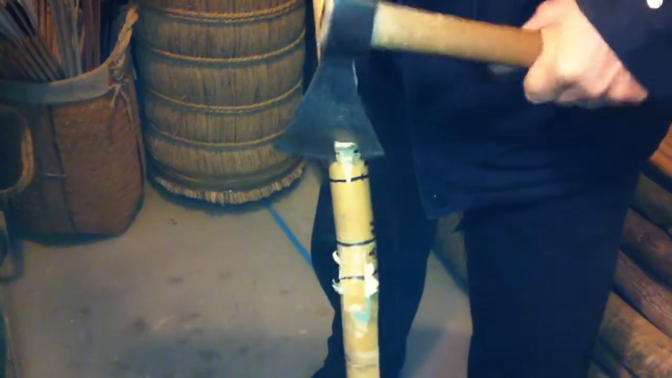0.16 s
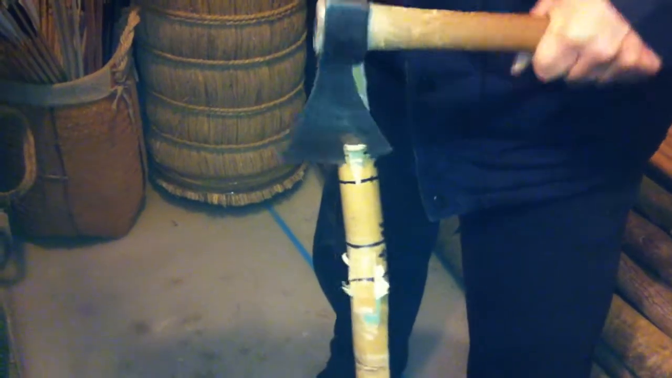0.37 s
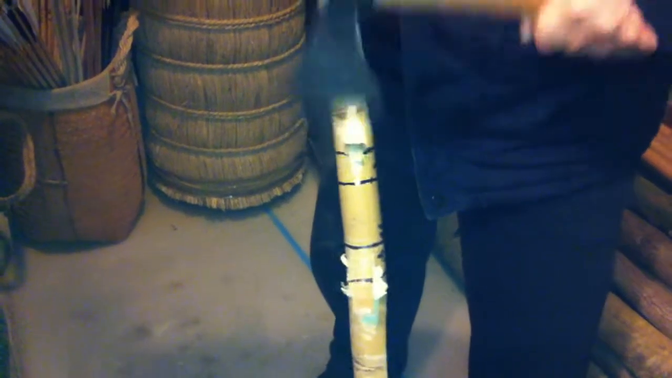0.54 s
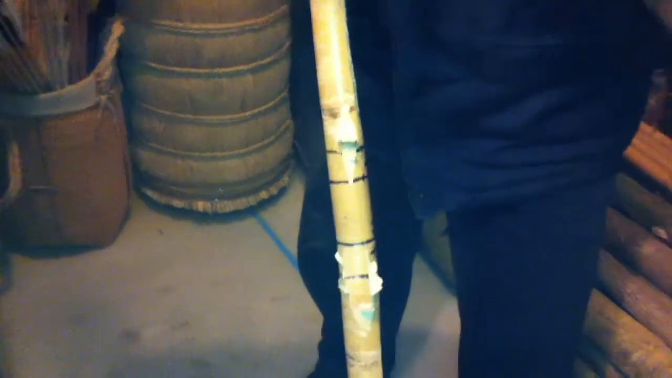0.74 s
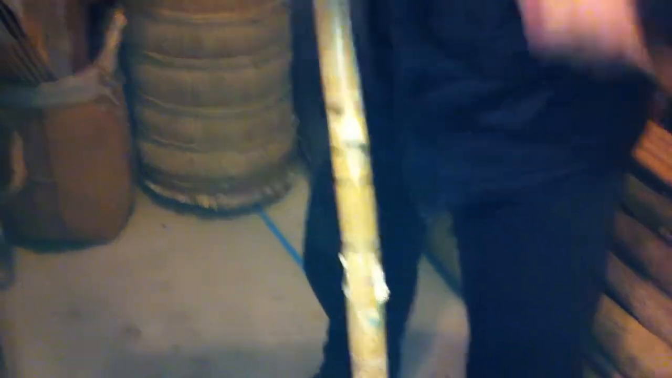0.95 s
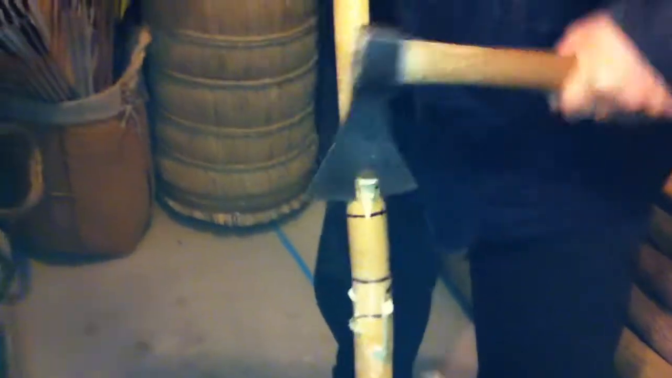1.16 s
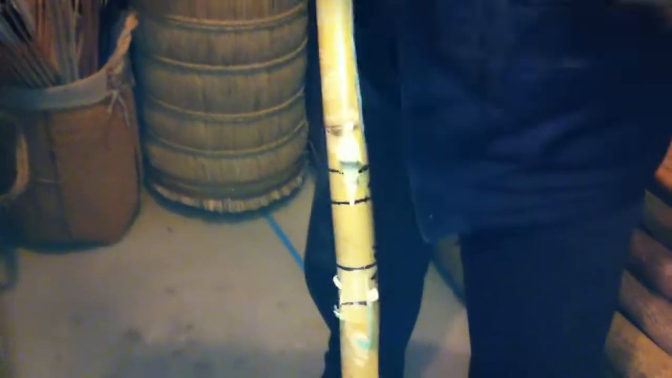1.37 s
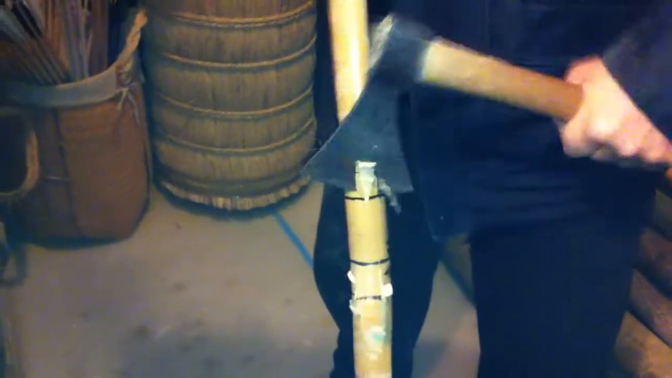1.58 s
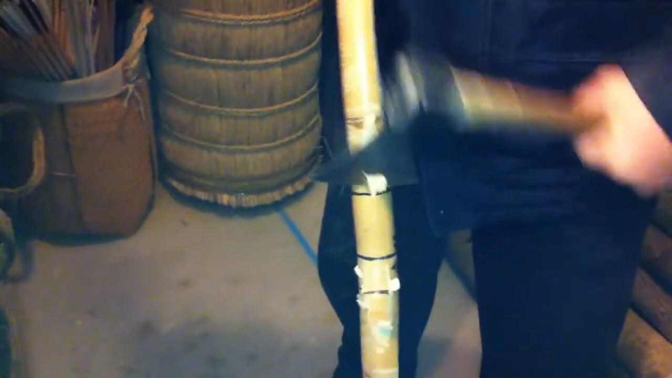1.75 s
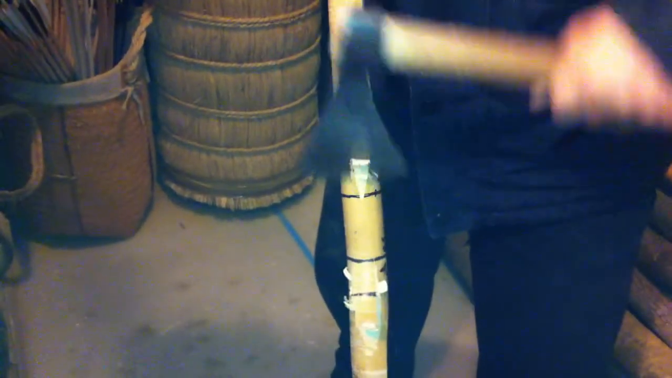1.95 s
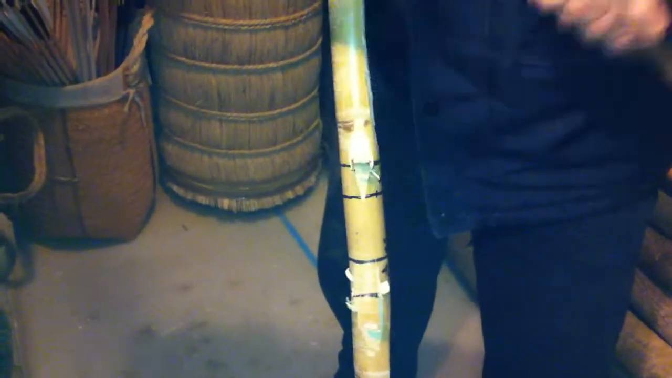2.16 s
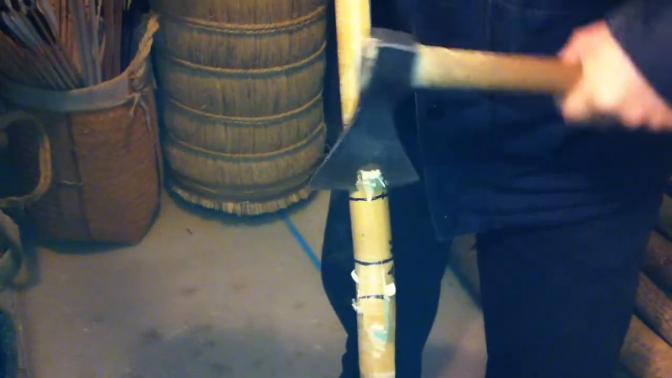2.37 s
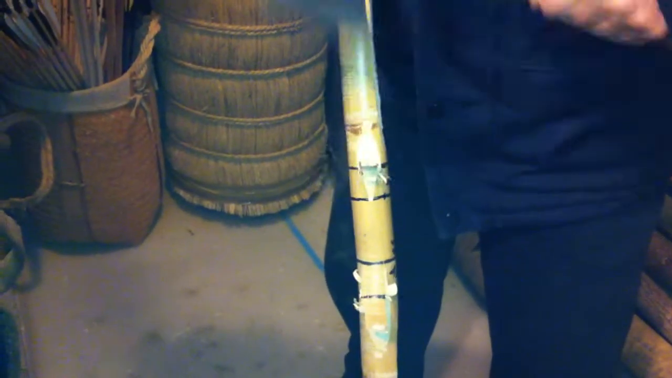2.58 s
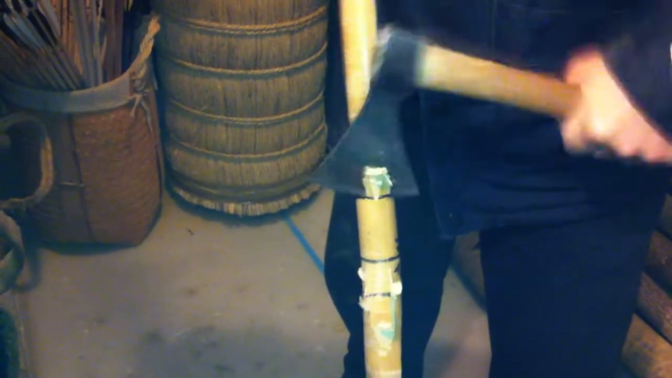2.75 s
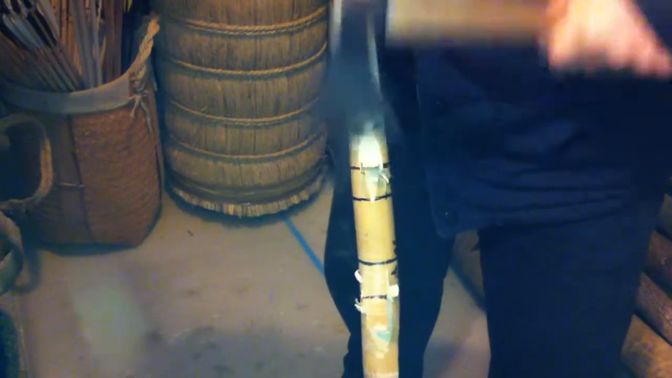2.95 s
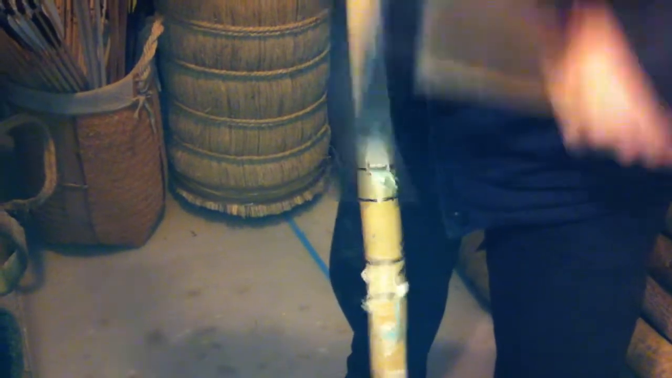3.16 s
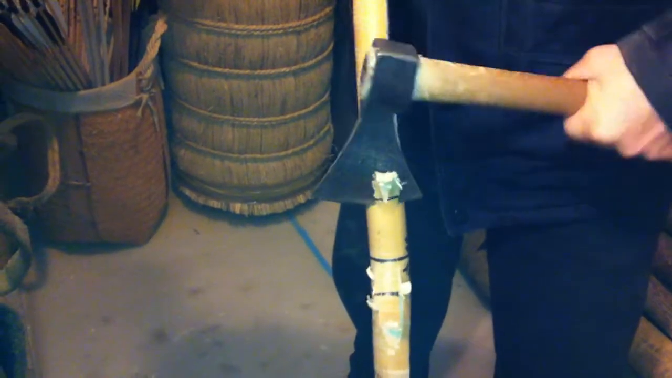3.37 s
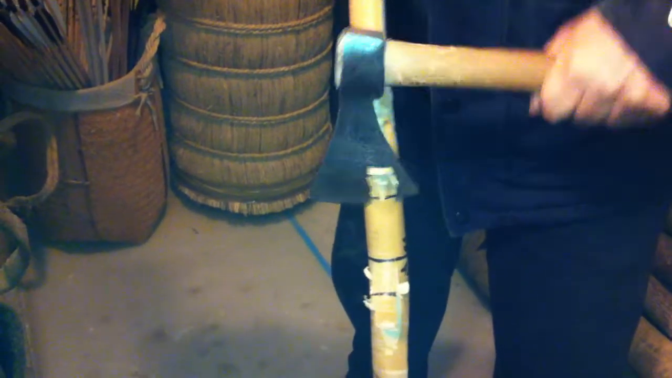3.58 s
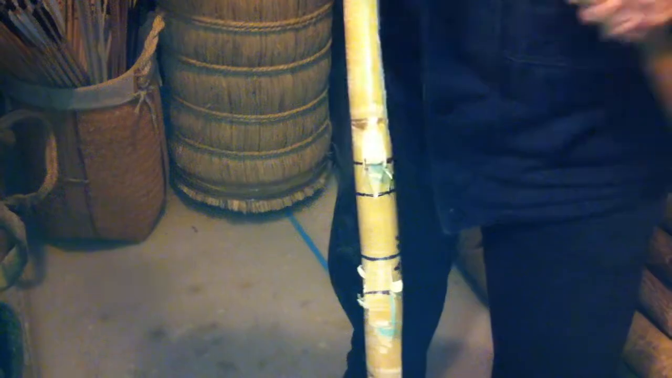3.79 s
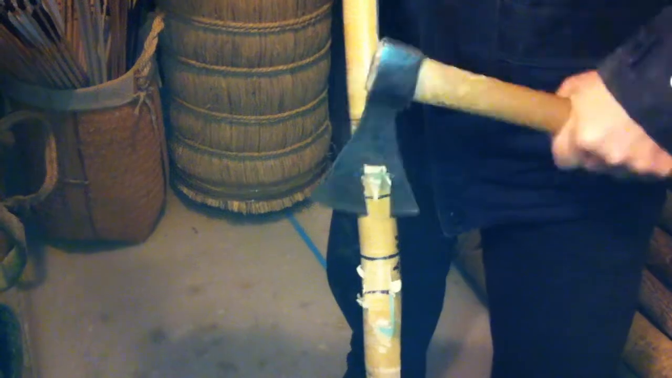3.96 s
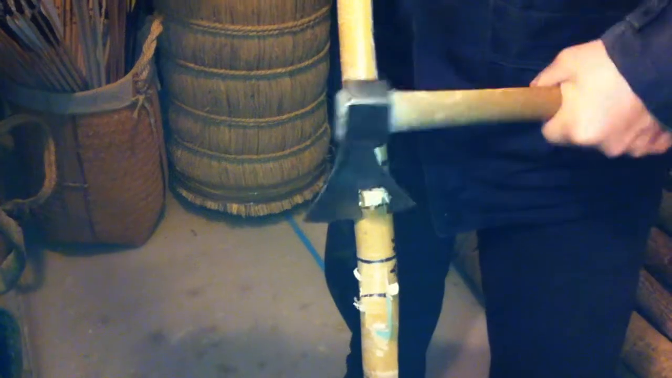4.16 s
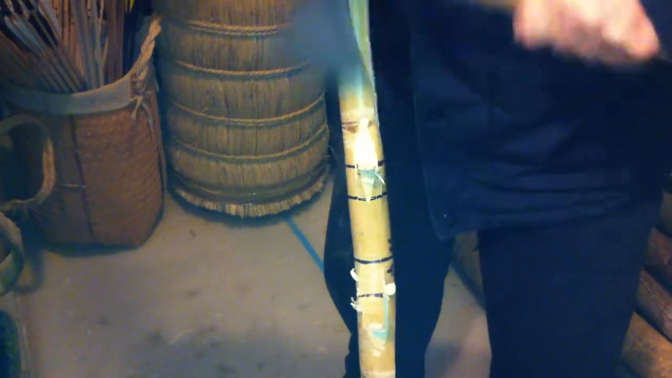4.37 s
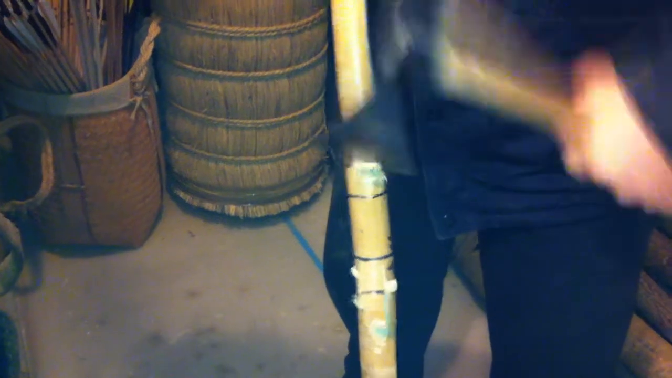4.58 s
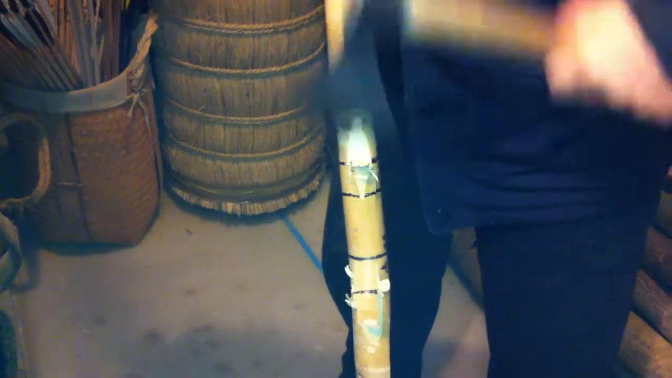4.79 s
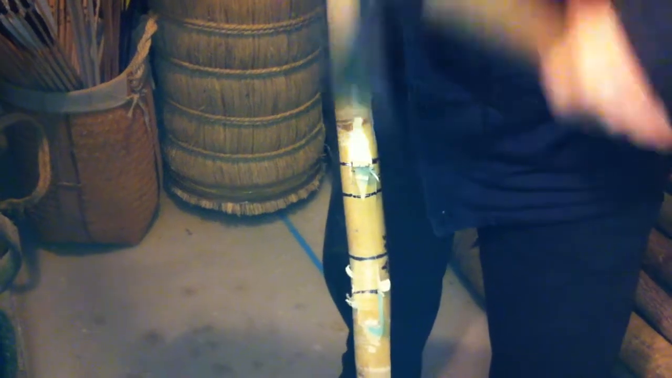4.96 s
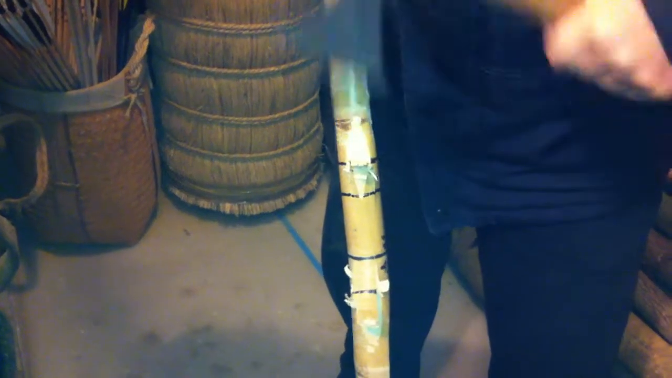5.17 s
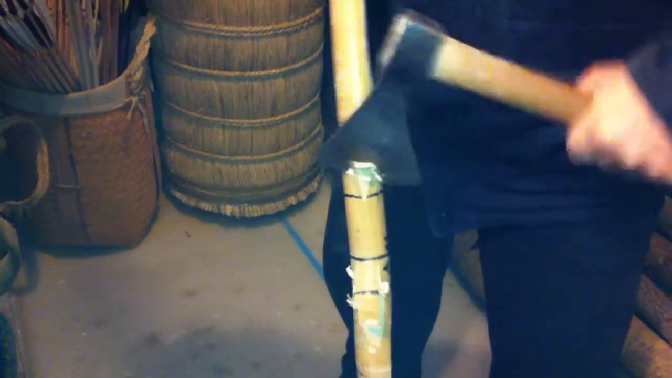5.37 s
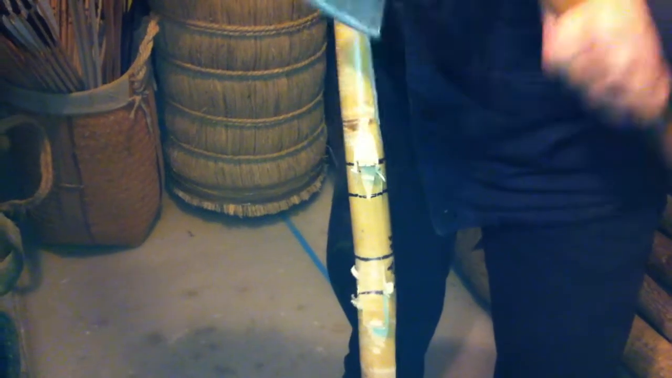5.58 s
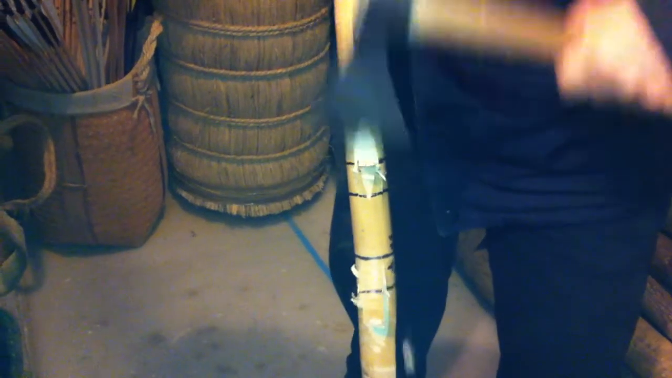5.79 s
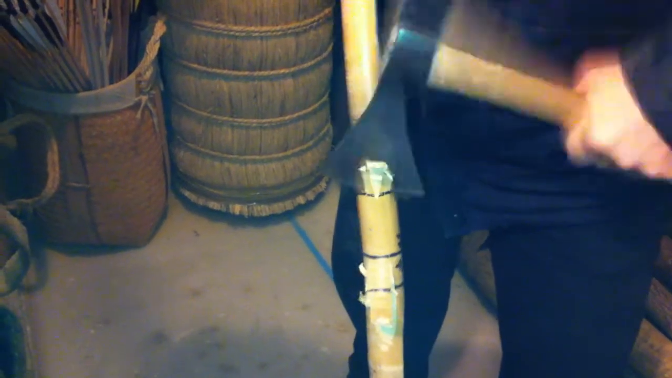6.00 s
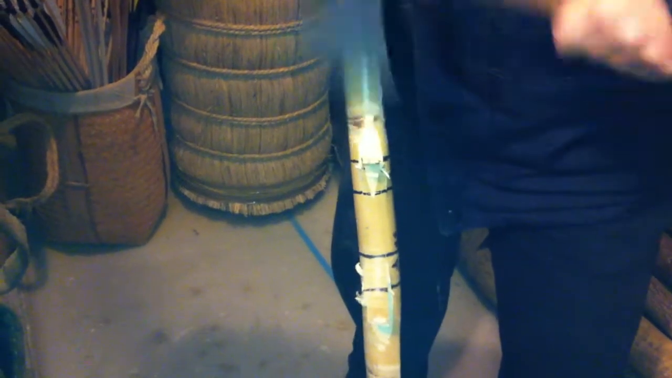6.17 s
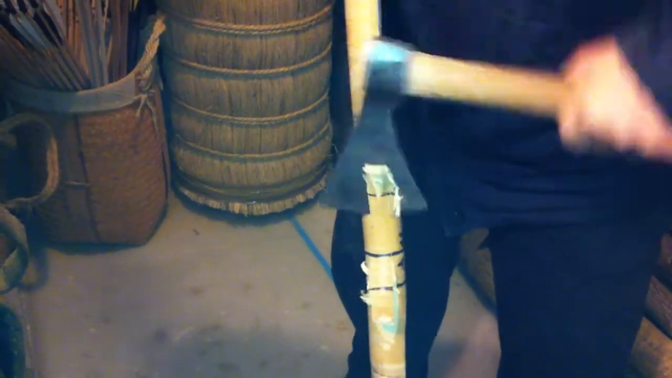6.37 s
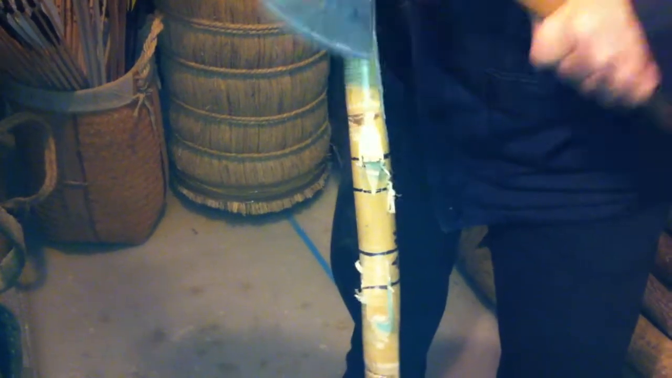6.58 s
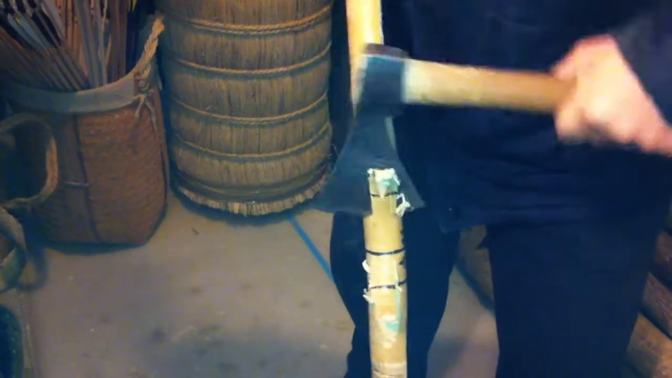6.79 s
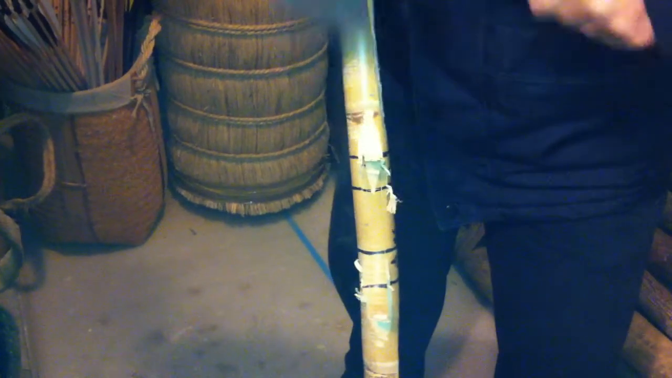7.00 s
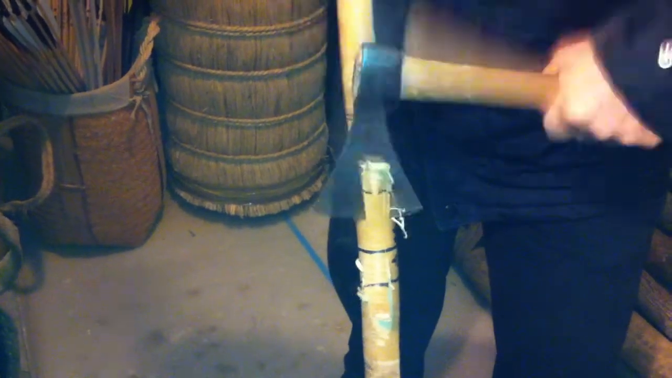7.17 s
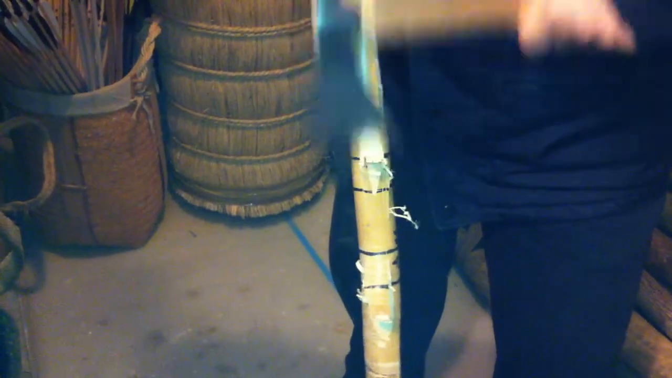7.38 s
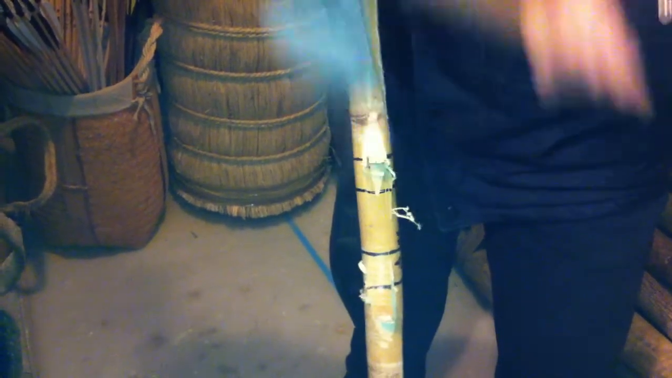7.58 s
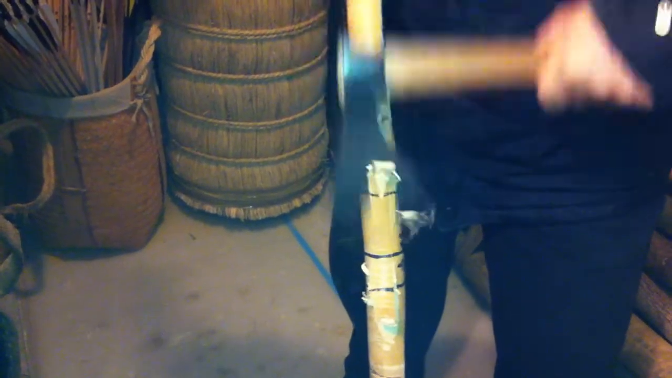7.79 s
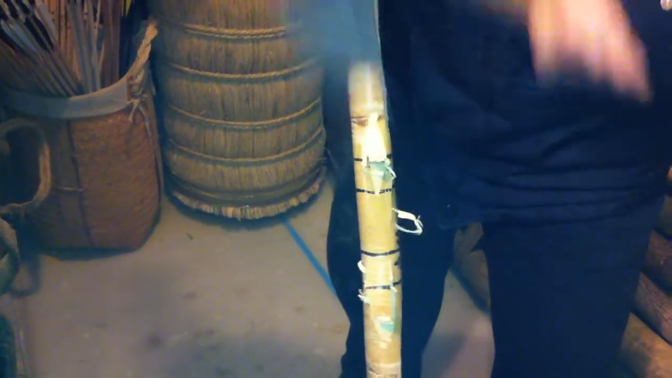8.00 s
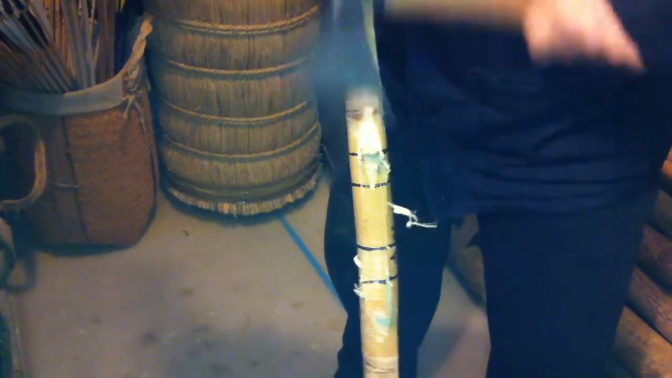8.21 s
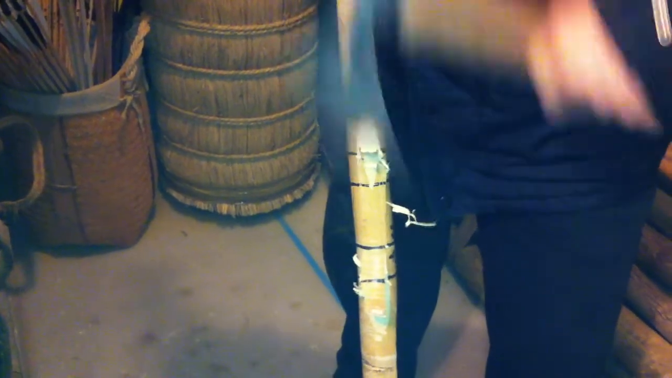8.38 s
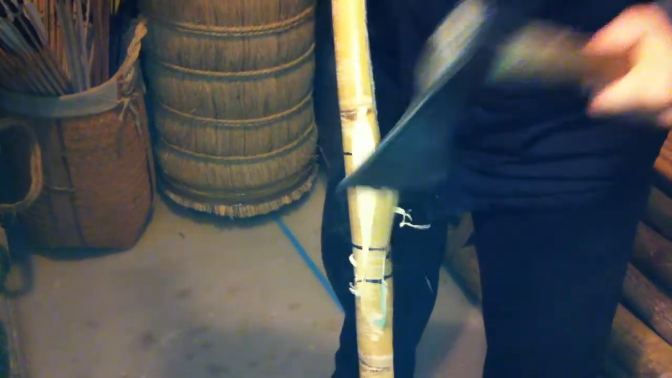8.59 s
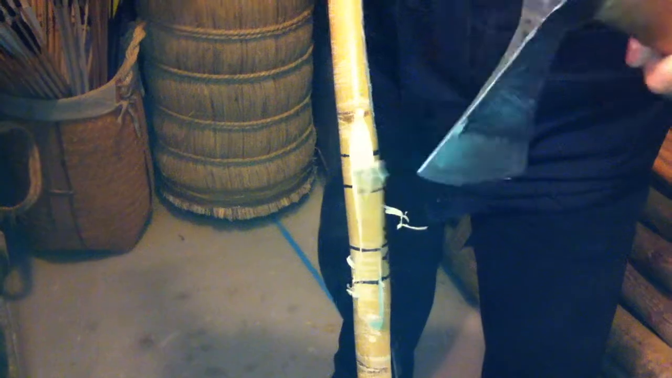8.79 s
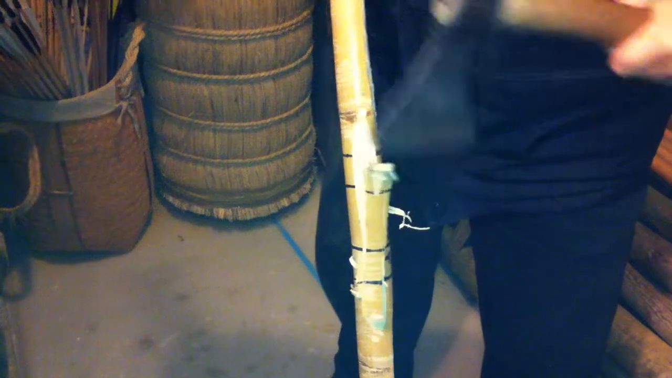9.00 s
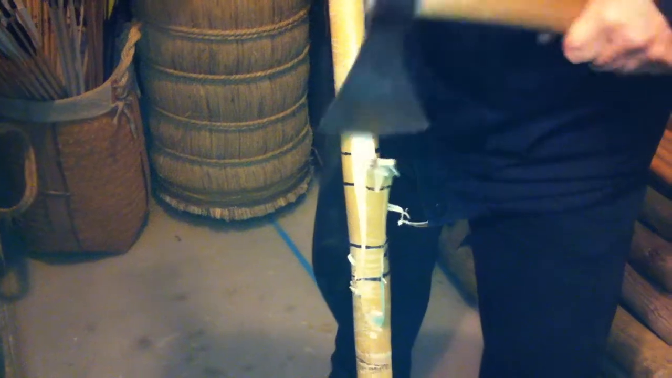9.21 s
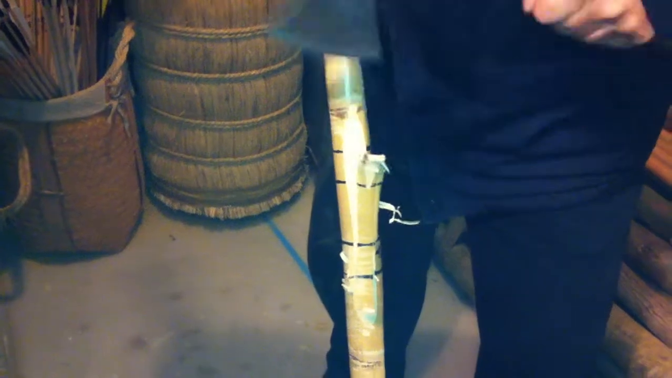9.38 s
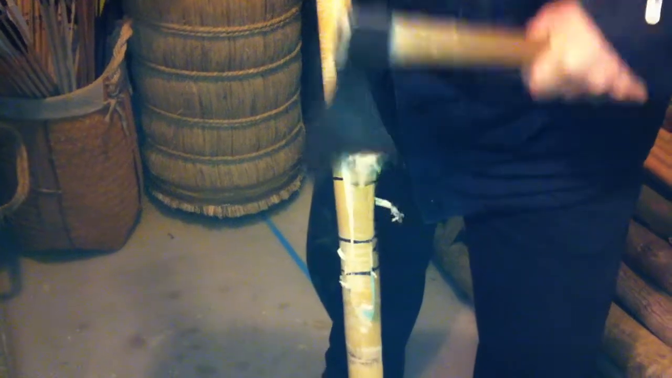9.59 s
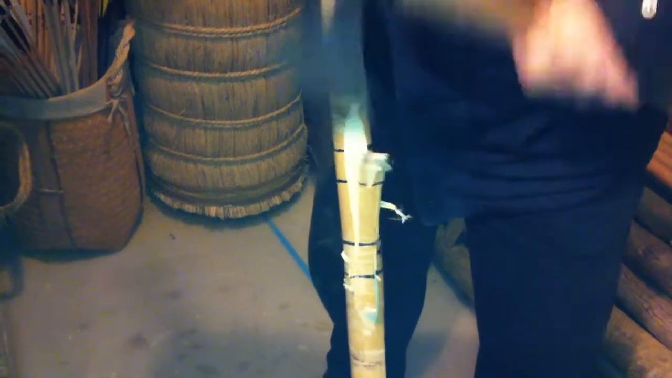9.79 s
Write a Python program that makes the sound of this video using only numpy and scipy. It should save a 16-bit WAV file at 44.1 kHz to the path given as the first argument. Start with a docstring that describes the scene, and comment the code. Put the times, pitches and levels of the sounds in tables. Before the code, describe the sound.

A hatchet chops a wooden stave, close to the microphone. Each blow is a hard, dry knock with crunching fibres, a clipped metallic clank and a light floor thud. Spaced out at first, the blows become brisker, then give way to scraping, splitting and a bright blade ring before one last chop. A small workshop answers immediately, with a fainter larger space behind and soft hiss.

```python
"""Sharp wooden chops are heard first: a steel hatchet hews a stave standing on a workshop floor, close by.
Each chop excites floor and stave modes, cracks fibres as filtered noise and rings the blade, which the cut damps.
Between chops the edge slides and brushes, single fibres snap, and the blade, lifted out, sings freely.
The shop answers at once, a larger space behind it a tenth of a second later, over a quiet hiss."""
import sys
import numpy as np
from scipy import signal
from scipy.fft import rfft, irfft, next_fast_len
from scipy.io import wavfile
from scipy.ndimage import uniform_filter1d

SR = 44100
rng = np.random.default_rng(int(sys.argv[2]) if len(sys.argv) > 2 else 0)


def put_to_file(sound):
    """Save the sound as 16-bit audio at rate SR, in the file named by the first command-line argument."""
    columns = np.atleast_2d(sound).T  # one column per channel
    safe = np.clip(columns, -1, 1)
    whole_steps = np.round(safe * 32767)
    wavfile.write(sys.argv[1], SR, whole_steps.astype(np.int16))


N = 434385  # length in samples


# Bending modes of the steel blade: pitch_hz
BLADE_HZ = [3005, 3965, 4750, 5010, 5660, 5905, 7295, 8800, 9490, 9745, 10925, 11700, 12950, 14290, 14760,
            15230]
# The same modes with the blade hanging free: level_db (relative), t60_s
BLADE_FREE = [(-1, 1.4), (2, .15), (0, .28), (-4, .12), (-10, .12), (-1, .6), (-1, .11), (1, .17),
              (-5, .18), (2, .18), (-4, .12), (-13, .12), (-17, .05), (-6, .15), (-3, .09), (-11, .12)]
BLADE = np.column_stack([BLADE_HZ, BLADE_FREE])
# Full blows of the hatchet: start_s, knock_db, low_knock_db, fibre_crack_db, steel_db
CHOPS = [(0.1096, -10.5, -15.5, -15, -20.5), (1.1166, -11, -17, -14.5, -19),
         (1.715, -32.5, -19.5, -26.5, -33), (1.7185, -24, -20, -20, -28),
         (2.4287, -12, -16.5, -14.5, -27.5), (2.8881, -16, -21.5, -13, -24.5),
         (3.3411, -11, -20.5, -12, -20), (4.0856, -12, -20.5, -14, -17.5), (4.7428, -15.5, -17.5, -19, -29),
         (5.1434, -15, -19, -13, -18), (5.4849, -13, -18, -14.5, -21), (5.8356, -11, -17.5, -16.5, -21.5),
         (6.1537, -10.5, -15.5, -11, -27.5), (6.4991, -12.5, -19.5, -11, -14),
         (6.5379, -28, -29.5, -33.5, -44), (6.8275, -15, -21, -19.5, -18.5),
         (7.3003, -13, -34, -16.5, -20.5), (7.3195, -11.5, -36, -26.5, -30),
         (7.7685, -9.5, -21.5, -18, -29), (8.168, -26.5, -31, -29, -27), (8.2007, -15.5, -23.5, -53, -32),
         (9.6775, -16.5, -17.5, -19, -42)]


def chop(start_s, knock_db, low_db, crack_db, steel_db):
    """Damped modal excitation: the blade judders into the cut and stays there, so all its modes die fast."""
    crunch_t60_s, thud_re_low_db = 0.027, -19
    judder_t60_s, cut_damping_per_s = 0.057, 26
    begin_s, out = knock(start_s, knock_db, low_db + thud_re_low_db, low_db, crack_db, crunch_t60_s)
    t = np.arange(2048) / SR
    judder = grit(len(t), 2.4) * gain_of(-60 * t / judder_t60_s)
    judder[0] += 10.5  # the landing
    steel = signal.fftconvolve(judder, ring(BLADE, 0.3, cut_damping_per_s, spread_db=2.3))
    add(out, start_s - begin_s, peaked(steel, steel_db))
    return begin_s, out


# The hatchet brushes the stave or leaves the cut: start_s, knock_db, low_knock_db, fibre_crack_db
TOUCHES = [(0.6137, -44, -52, -54), (0.8704, -59.5, -60, -60.5), (1.0328, -60, -50, -57),
           (1.3793, -47.5, -52, -50.5), (2.6131, -47.5, -53, -51.5), (3.7798, -55, -67, -52.5),
           (4.42, -57.5, -61.5, -54.5), (5.5996, -51.5, -56, -53), (7.436, -40, -40, -44),
           (7.9484, -67.5, -60, -58), (8.4317, -41, -47, -40.5), (8.5185, -35.5, -35.5, -38),
           (8.55, -33, -52, -32), (9.3057, -24, -25, -31)]


def touch(start_s, knock_db, low_db, crack_db):
    """Weak impact: a glancing contact gives a longer crunch and little force."""
    crunch_t60_s, thud_re_low_db = 0.06, -14
    return knock(start_s, knock_db, low_db + thud_re_low_db, low_db, crack_db, crunch_t60_s)


# Lower modes of the stave, before random spread: pitch_hz, level_db (relative), t60_s
STAVE_LOW = [(350, -17, 0.037), (470, -24, 0.0067), (554, -20.5, 0.0086), (700, -12, 0.012),
             (830, 3.5, 0.02), (907.5, 7.5, 0.012), (1044.5, 5.5, 0.015), (1200, 4.5, 0.014),
             (1327, 3.5, 0.0074)]
# Upper modes of the stave, before random spread: pitch_hz, level_db (relative), t60_s
STAVE_HIGH = [(1553, -9.5, 0.022), (1705, -5.5, 0.029), (1729, -2, 0.019), (1944, -0.5, 0.01),
              (2174, -2, 0.024), (2144, -12.5, 0.033), (2406, 4.5, 0.012), (2515, 5.5, 0.0083),
              (2840, 2, 0.003)]
# Spectrum of parting fibres: pitch_hz, level_db (relative)
CRACK = [(150, -25.5), (500, -8), (1500, -7), (3300, 2.5), (5000, 1.2), (7500, -4), (8200, -13.5),
         (10000, -10), (13000, -20.5), (15500, -13.5)]


def knock(start_s, knock_db, thud_db, low_db, crack_db, crunch_t60_s):
    """Source-filter impact: steel lands on wood, then crushes fibres; this force drives the stave's modes."""
    lead = 64  # samples before the landing
    t = np.arange(-lead, 6000) / SR
    landing = t == 0
    crush = grit(len(t), 4.4) * gain_of(-60 * t / crunch_t60_s) * (t > 0)
    force = crush + 16 * landing  # the landing outweighs the crunch
    low = signal.fftconvolve(force, ring(STAVE_LOW, 0.1, spread_db=2, detune=0.03))
    high = signal.fftconvolve(force, ring(STAVE_HIGH, 0.1, spread_db=2, detune=0.015))
    split = crush + 5 * landing  # the first fibres part all at once
    crack = coloured(split, CRACK) * signal.windows.tukey(len(t), 0.02)
    out = np.zeros(SR)
    add(out, lead / SR, peaked(thud(), thud_db))
    add(out, 0, peaked(low, low_db))
    add(out, 0, peaked(high, knock_db))
    add(out, 0, peaked(crack, crack_db))
    return start_s - lead / SR, out


# Modes of the floor boards, before random spread: pitch_hz, level_db (relative), t60_s, build_up_s
FLOOR_MODES = [(130, -9, .2, .03), (148, -6, .2, .03), (167, -2, .2, .022), (200, -2, .13, .012),
               (241, 5, .07, .004), (310, -3, .05, .003)]


def thud():
    """Resonance build-up: the floor boards boom, and the deepest modes take longest to reach full strength."""
    t = np.arange(SR // 2) / SR
    boom = np.zeros(len(t))
    for pitch_hz, level_db, t60_s, build_up_s in FLOOR_MODES:
        mode = ring([(pitch_hz, level_db, t60_s)], 0.5, spread_db=0.5, detune=0.037)
        boom += mode * (1 - np.exp(-t / build_up_s))
    return boom


# Spectrum of tearing fibres: pitch_hz, level_db (relative)
TEAR = [(2000, -3), (5000, 2), (7500, 6.5), (10000, 4.5), (13000, 2.5), (16000, 3.5)]
# The edge slides along the grain or a chip tears loose: loudest_s, wood_db, tearing_db, swell_s, fade_t60_s
SLIDES = [(0.596, -86, -63, 0.017, 0.065), (0.625, -46, -56.5, 0.019, 0.086), (1.74, -58, -36, .01, 0.06),
          (1.815, -72, -53, 0.0057, 0.17), (1.935, -71, -53.5, .08, 0.1), (2.13, -74.5, -57.5, 0.052, .1),
          (2.616, -50, -56, 0.023, 0.05), (3.78, -65, -52.5, 0.027, .2), (4.818, -47.5, -39.5, .015, 0.13),
          (4.886, -61, -52, .03, 0.12), (5.26, -54, -51.5, 0.044, .15), (5.604, -51.5, -42, 0.014, 0.094),
          (6.64, -59, -46.5, 0.068, .15), (6.85, -40.5, -36.5, .01, 0.057), (7.03, -61, -57.5, 0.096, 0.17),
          (7.308, -19.5, -30.5, 0.0059, .08), (7.335, -25, -32, 0.011, 0.027),
          (7.46, -49, -52, 0.036, 0.31), (7.804, -27.5, -25.5, 0.023, 0.03),
          (7.93, -52.5, -57.5, 0.066, 0.41), (8.186, -26, -52, .015, 0.029),
          (8.242, -33.5, -27, 0.038, 0.069), (8.33, -53, -48, 0.081, 0.19), (8.47, -53, -64, 0.032, 0.44),
          (8.565, -30, -42, 0.068, 0.046), (8.598, -72, -32, 0.049, 0.24), (8.688, -56, -47, 0.004, 0.31),
          (9.692, -25, -53, 0.0046, 0.11)]


def slide(loudest_s, wood_db, tear_db, swell_s, fade_s):
    """Stick-slip friction: grit under the edge drives stave and blade while fibres tear; it swells, then fades."""
    swell_depth_db, steel_re_wood_db, sliding_damping_per_s = 17, -5.5, 18
    t = np.arange(-swell_s, fade_s, 1 / SR)
    push_db = np.where(t < 0, swell_depth_db * t / swell_s, -60 * t / fade_s)
    push = signal.windows.tukey(len(t), 0.05) * gain_of(push_db)
    stave = ring(STAVE_LOW + STAVE_HIGH, 0.1, spread_db=4.5)
    steel = ring(BLADE, 0.1, sliding_damping_per_s, spread_db=2.0)
    body = stave / np.linalg.norm(stave)
    body += gain_of(steel_re_wood_db) * steel / np.linalg.norm(steel)
    out = signal.fftconvolve(gain_of(wood_db) * push * grit(len(t), 3.8), body)
    tearing = evened(coloured(grit(len(t), 1.9), TEAR))
    add(out, 0, gain_of(tear_db) * push * tearing)
    return loudest_s - swell_s, out


# Single fibres snap as a chip is levered off: start_s, peak_db, pitch_hz
SNAPS = [(0.1885, -49, 13000), (0.5348, -55, 7030), (1.8113, -39, 12900), (1.8308, -46.5, 12450),
         (1.8717, -43, 14100), (1.8931, -42.5, 13480), (1.9106, -45, 12900), (1.9316, -43, 13030),
         (1.961, -40.5, 13500), (2.0662, -50, 12100), (2.2688, -50.5, 9700), (4.2867, -47.5, 13000),
         (4.4594, -54.5, 9700), (4.817, -31, 5200), (5.1003, -57.5, 6130), (5.2574, -41.5, 9900),
         (6.2736, -46.5, 9700), (6.6443, -39, 14200), (6.9794, -46.5, 6000), (7.3916, -39, 7800),
         (7.874, -38.5, 9000), (8.5955, -23, 7800), (8.6348, -38, 8840)]


def snap(start_s, peak_db, pitch_hz):
    """Sudden release of strain: a breaking fibre gives a few bright cycles and a hiss."""
    t = np.arange(512) / SR
    cycles = np.sin(2 * np.pi * pitch_hz * t)
    hiss = 0.7 * coloured(grit(len(t), 2.2), TEAR)
    burst = (cycles + hiss) * gain_of(-60 * t / 0.0069)  # t60 in s
    return start_s, peaked(burst, peak_db)


# The blade sings once it is nearly free:
# start_s, low_tone_db, upper_tone_db, other_modes_db, contact_damping_per_s, throb_depth (0-1), length_s
RINGS = [(0.616, -56.5, -49.5, -60.5, 1.34, 0.5, 0.35), (2.618, -53.5, -61, -68, 0.14, 0.1, 0.4),
         (3.79, -59, -58, -60, 0.58, 0.04, 0.43), (4.425, -53.5, -77, -61.5, 0.11, 0.05, 0.35),
         (7.956, -69, -54.5, -69, 0.09, 0.1, 0.19), (8.434, -58, -51, -54, 2.5, 0.16, .09),
         (8.685, -48, -43.5, -52.5, 0.033, 0.1, 0.7), (9.305, -32.5, -36.5, -38.5, 0.07, 0.15, 0.42),
         (9.699, -45, -64, -52, 0.71, 0.1, .2)]
LOW_TONE, UPPER_TONE = 0, 5  # rows of the two long-ringing blade modes


def sing(start_s, low_db, upper_db, rest_db, contact_per_s, throb, length_s):
    """Free vibration until something touches the blade; the low tone throbs when the hatchet swings."""
    t = np.arange(round(length_s * SR)) / SR
    swing = 1 - throb * np.cos(2 * np.pi * 6.1 * (t - 0.178))  # 6.1 Hz
    other_modes = np.delete(BLADE, [LOW_TONE, UPPER_TONE], axis=0)
    low = gain_of(low_db) * swing * ring(BLADE[[LOW_TONE]], length_s, contact_per_s)
    upper = gain_of(upper_db) * ring(BLADE[[UPPER_TONE]], length_s, contact_per_s)
    rest = gain_of(rest_db) * ring(other_modes, length_s, contact_per_s, spread_db=4.5)
    ends = np.clip(np.minimum(t / 0.001, (length_s - t) / 0.006), 0, 1)  # short fades
    return start_s, (low + upper + rest) * ends


# Decay of the near walls: pitch_hz, t60_s
SHOP = [(120, .28), (320, .22), (840, .14), (2200, .12), (5800, .12), (9500, .16), (15000, .15)]
# Decay of the larger space: pitch_hz, t60_s
FAR = [(120, 2.9), (500, 0.78), (2000, 0.85), (5000, 0.48), (10000, 1.13), (16000, 0.11)]
# Spectrum returned by the larger space: pitch_hz, level_db (relative)
FAR_TONE = [(100, -14.5), (500, -2.94), (2000, -8), (5000, 1), (10000, -21), (16000, -3)]


def rooms(x):
    """Reverberation as convolution: near walls, a murmur through the doorway, then the far wall's return."""
    wet = np.zeros(N)
    turn = np.arange(N) / SR * 2.23  # rad; three versions take turns, as the worker shifts
    for k in range(3):
        near = gain_of(-5.0) * tail(SHOP, 0.0015, 1.3)
        far_wall = gain_of(-25.0) * tail(FAR, 0.13, 1.3)
        doorway = gain_of(-18.0) * tail(FAR, 0.033, 1.3)
        response = near + coloured(far_wall + doorway, FAR_TONE)
        share = np.sqrt(2 / 3) * np.cos(turn + k * np.pi / 3)  # the squared shares always add up to 1
        wet += signal.fftconvolve(x * share, response)[:N]
    return wet


def tail(decays, start_s, seconds):
    """Diffuse reflections: sparse taps of random sign, each band dying at its own speed; energy 1."""
    taps = np.zeros(round(seconds * SR))
    slots = np.arange(round(start_s * SR), len(taps) - 16, 16)  # one tap in every 16 samples
    taps[slots + rng.integers(0, 16, len(slots))] = rng.choice([-1., 1.], len(slots))
    hz, t, z = signal.stft(taps, SR, nperseg=256)
    fade = gain_of(-60 * t / read(decays, hz)[:, None])
    out = signal.istft(z * fade, SR, nperseg=256)[1]
    return out / np.linalg.norm(out)


# Spectrum of the background: pitch_hz, density_db (per Hz, relative)
AIR = [(60, -34.5), (130, -5.5), (250, 1.5), (500, -4), (1000, -1), (2500, -3.5), (6000, -6), (16000, -8)]


def air():
    """Stationary filtered noise: the quiet of the shop and the microphone's hiss, swelling a little."""
    t = np.arange(N) / SR
    swell = np.zeros(N)
    for rate_hz in np.geomspace(0.2, 6, 16):
        swell += np.sin(2 * np.pi * (rate_hz * t + rng.random())) / np.sqrt(rate_hz)
    level_db = -66.5 + 0.7 * evened(swell)
    hiss = coloured(rng.standard_normal(next_fast_len(N)), AIR)[:N]
    return gain_of(level_db) * evened(hiss)


def ring(modes, seconds, damping_per_s=0., spread_db=0., detune=0.):
    """Modal superposition: dying sines of alternate sign; contact damping shortens every ring."""
    hz, db, t60 = np.transpose(modes)[:, :, None]
    # where the blow lands changes each mode's share; detune scatters pitch by a fraction
    share_luck, pitch_luck = rng.standard_normal((len(modes), 2)).T[:, :, None]
    t = np.arange(round(seconds * SR)) / SR
    fade_db = 60 * t * (1 / t60 + damping_per_s)
    sign = (-1.) ** np.arange(len(modes))[:, None]
    sines = sign * np.sin(2 * np.pi * hz * (1 + detune * pitch_luck) * t)
    return (gain_of(db + spread_db * share_luck - fade_db) * sines).sum(0)


def grit(count, spread_db):
    """Heavy-tailed noise: uneven little impacts, a few much larger than the rest."""
    size_db = spread_db * np.minimum(rng.exponential(1, count), 5)
    return evened(rng.standard_normal(count) * gain_of(size_db))


def coloured(x, points):
    """Linear filtering: multiplies the spectrum by (Hz, dB) points."""
    hz = np.fft.rfftfreq(len(x), 1 / SR)
    return irfft(rfft(x) * gain_of(read(points, hz)), len(x))


def read(points, hz):
    """Logarithmic pitch scale: reads (Hz, value) points on a log-frequency axis."""
    f, value = np.transpose(points)
    return np.interp(np.log(hz + 1), np.log(f + 1), value)


def gain_of(db):
    """Level law: decibels to amplitude."""
    return 10 ** (np.asarray(db) / 20)


def evened(x):
    """Mean-power normalisation: scales to rms 1."""
    return x / np.sqrt(np.mean(x ** 2) + 1e-20)


def peaked(x, db):
    """Short-time power normalisation: scales so that the loudest 3 ms reach db."""
    return x * gain_of(db) / np.sqrt(uniform_filter1d(x ** 2, size=128).max() + 1e-20)


def add(mix, s, sound):
    """Superposition: mixes a sound in at s seconds."""
    part = mix[round(s * SR):][:len(sound)]
    part += sound[:len(part)]


def scene():
    """Superposition of all the work sounds, their rooms and the floor of noise."""
    work, song = np.zeros(N), np.zeros(N)
    for table, source in ((CHOPS, chop), (TOUCHES, touch), (SNAPS, snap), (SLIDES, slide)):
        for row in table:
            add(work, *source(*row))
    for row in RINGS:
        add(song, *sing(*row))
    # the flat blade beams its song forward, so the walls get less of it
    to_walls = work + song * gain_of(-2.0)
    return (work + song + rooms(to_walls) + air())[None]


def record(dry):
    """Transducer limits: the microphone loses deep bass and rounds off loud peaks; then the band limit."""
    bass_cut = signal.butter(3, 120., "high", fs=SR, output="sos")
    thin = signal.sosfilt(bass_cut, dry)
    soft = 0.8 * np.tanh(thin / 0.88)
    band_limit = signal.firwin(511, 15900, window=("kaiser", 9), fs=SR)  # low-pass edge in Hz
    return signal.oaconvolve(soft, band_limit[None], "same")


dry = scene()
out = record(dry)
put_to_file(out)
```